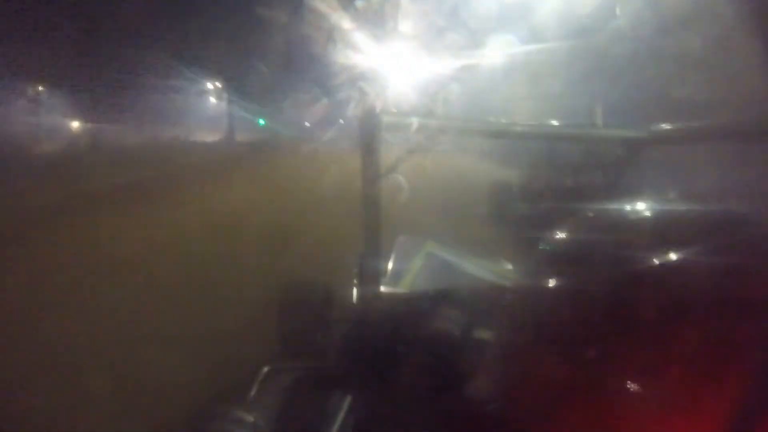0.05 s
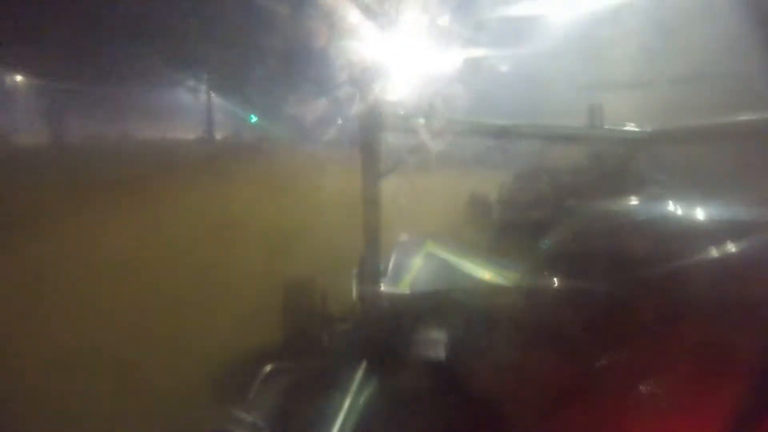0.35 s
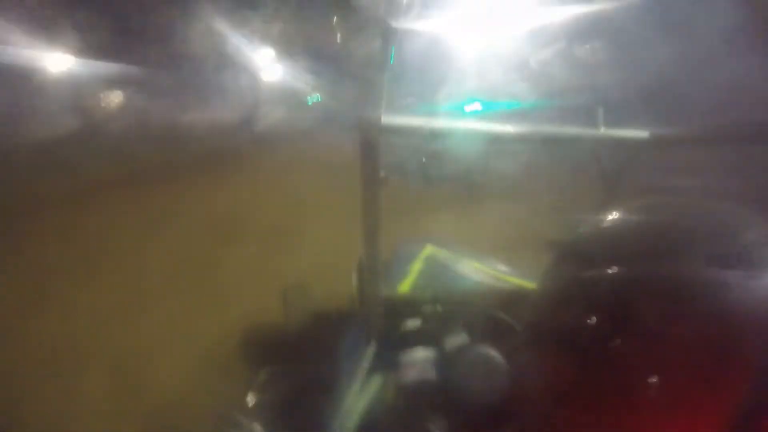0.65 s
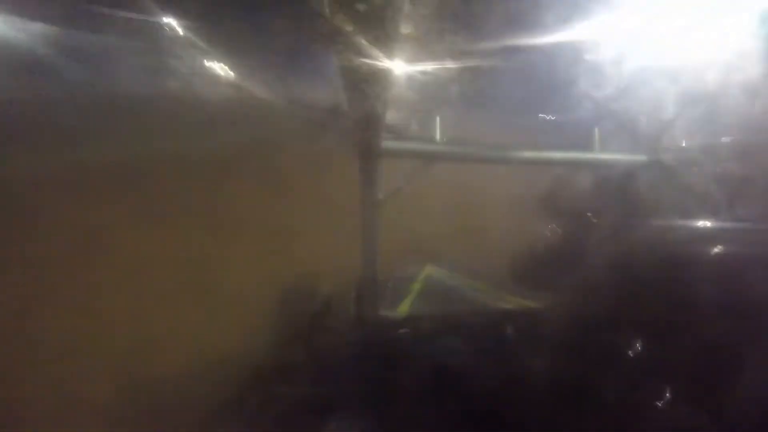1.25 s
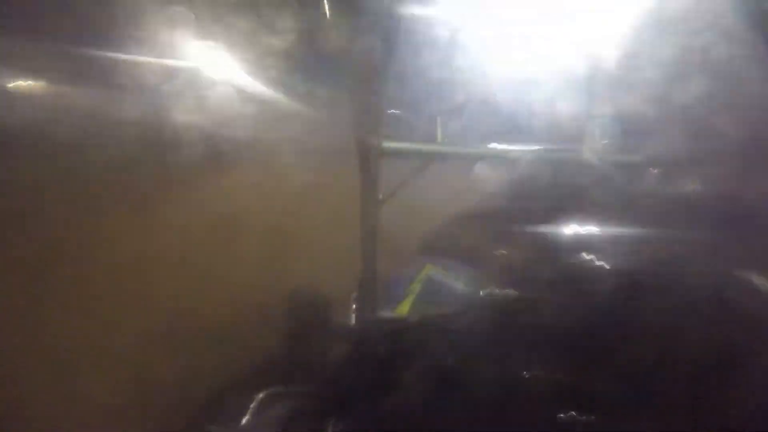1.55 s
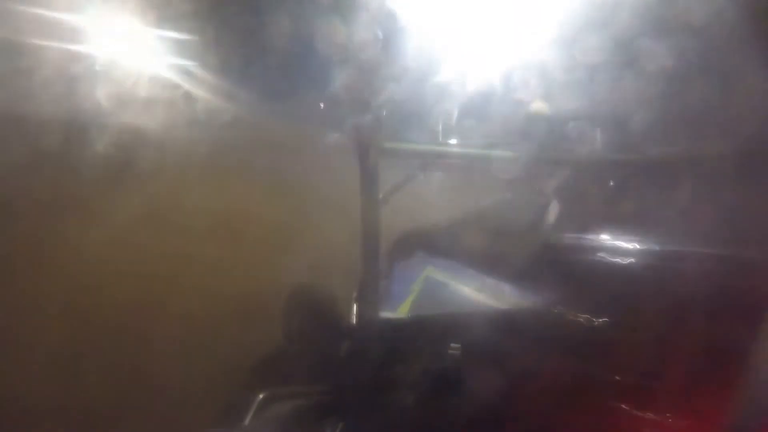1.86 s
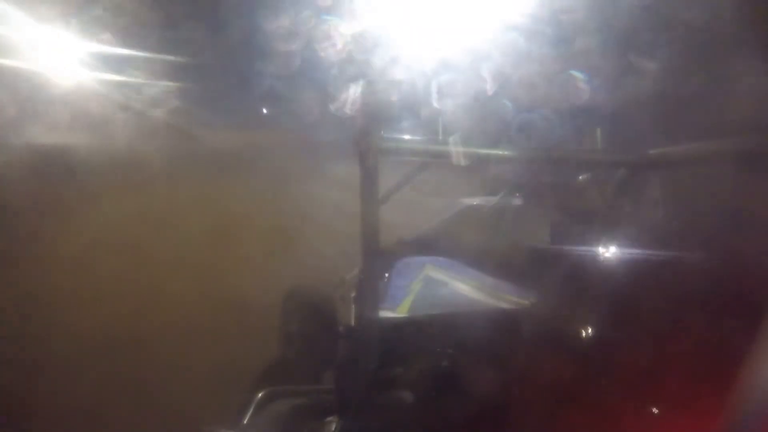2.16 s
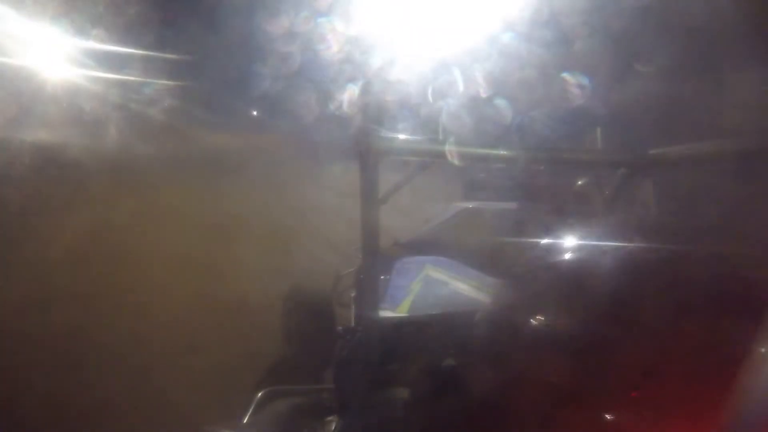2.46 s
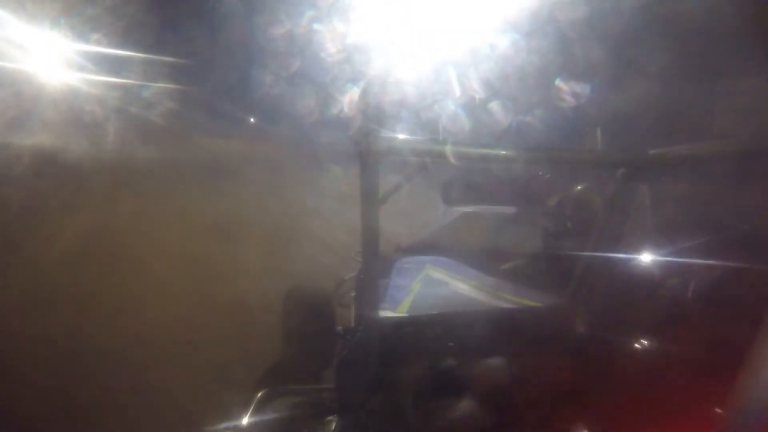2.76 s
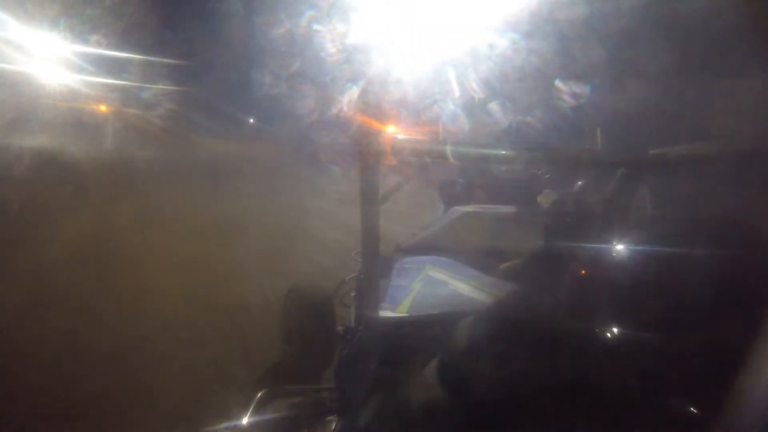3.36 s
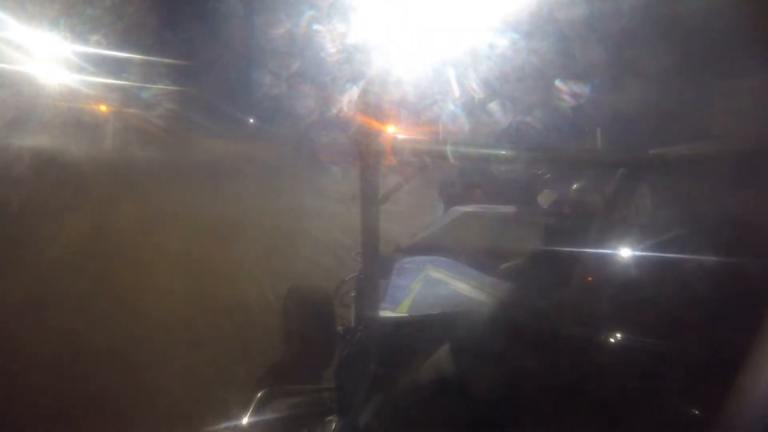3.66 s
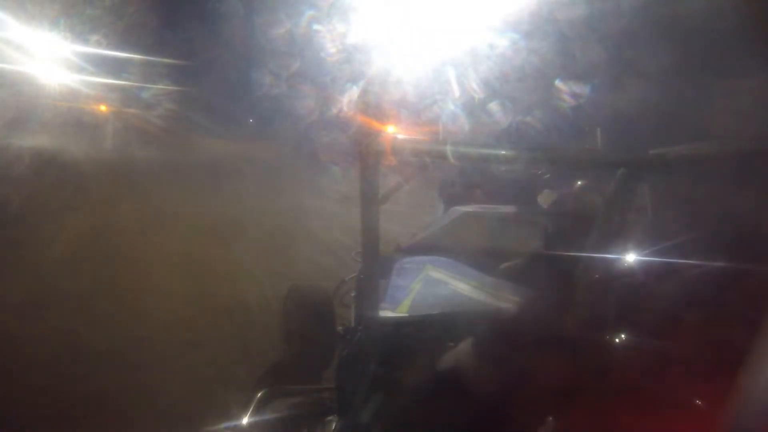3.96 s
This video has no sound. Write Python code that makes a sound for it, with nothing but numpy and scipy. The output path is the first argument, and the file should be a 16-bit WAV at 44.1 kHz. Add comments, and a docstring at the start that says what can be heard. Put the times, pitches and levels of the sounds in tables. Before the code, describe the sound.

A race car's engine roars, drops away, then the car crashes with metallic bangs and rattles.

```python
"""Crash inside a dirt-track race car

The engine roars flat out, a train of exhaust pulses; the throttle shuts and the pitch sinks.
The car hits something and jolts to a stop: blows excite the modes of panels and loose steel,
sheet metal creases, dirt rattles, the chassis bottoms out and the cab booms on one low note.
As it settles, the engines of the other cars grow louder, blurred by reflections."""
import sys
import numpy as np
from scipy import signal
from scipy.fft import rfft, irfft, next_fast_len
from scipy.io import wavfile
from scipy.ndimage import uniform_filter1d, map_coordinates

SR = 44100
rng = np.random.default_rng(int(sys.argv[2]) if len(sys.argv) > 2 else 0)


def generate_wav(sig):
    """Save sig (samples, or channels by samples) to the path in sys.argv[1] as 16-bit PCM at SR."""
    pcm = np.round(np.clip(np.atleast_2d(sig).T, -1, 1) * 32767).astype(np.int16)
    wavfile.write(sys.argv[1], SR, pcm)


N = 176400
T = np.arange(N) / SR
MODE_SCATTER_DB = 3  # a mode's strength varies from blow to blow


def from_db(db):
    """Amplitude ratio of a level in decibels."""
    return 10 ** (np.asarray(db) / 20)


def rms_one(x):
    """Normalisation to unit rms."""
    return x / np.sqrt(np.mean(x ** 2) + 1e-20)


def in_time(rows):
    """Linear interpolation of (time, value) rows at every sample."""
    return np.interp(T, *np.transpose(rows))


def drift(per_s):
    """Smooth random fluctuation of unit rms: a spline through Gaussian values."""
    slow = map_coordinates(rng.standard_normal(1000), [T[::40] * per_s + 2], order=3, mode="wrap")
    return np.interp(T, T[::40], rms_one(slow))


def add(out, start_s, sound):
    """Superposition of a sound from a given time on."""
    i = int(start_s * SR)
    out[i:i + len(sound)] += sound[:N - i]


def colour(x, spectrum):
    """Minimum-phase filtering by a spectrum of (frequency, level) rows; unit rms."""
    size = 2 * next_fast_len(len(x) // 2 + SR // 10, True)
    hz, db = np.transpose(spectrum)
    bin_hz = np.arange(size // 2 + 1) * SR / size
    log_gain = np.log(from_db(np.interp(np.log(bin_hz + 1), np.log(hz), db)))
    causal_cepstrum = irfft(log_gain)[:size // 2]
    response = np.exp(2 * rfft(causal_cepstrum, size))
    return rms_one(irfft(rfft(x, size) * response)[:len(x)])


def ring(force, hz, t60_s):
    """Forced response of one damped mode; unit rms."""
    radius, angle = from_db(-60 / (t60_s * SR)), 2 * np.pi * hz / SR
    return rms_one(signal.lfilter([1, -1], [1, -2 * radius * np.cos(angle), radius ** 2], force + 1e-18))


def damp(x, top_hz=4370):
    """Low-pass filtering: the metal rings little at high frequencies."""
    return signal.sosfilt(signal.butter(8, top_hz, fs=SR, output="sos"), x)


def smear(x, decay_s):
    """Dense reflections as an all-pass filter: pulses blur but keep their spectrum."""
    echoes = rfft(rng.standard_normal(N) * np.exp(-T / decay_s))
    return irfft(rfft(x) * echoes / (np.abs(echoes) + 1e-12), N)


def tones(pulse_hz, orders, waver_db):
    """Engine orders: sines at multiples of the pulse rate, each wavering in level."""
    phase = 2 * np.pi * np.cumsum(pulse_hz) / SR
    return sum(np.sqrt(2) * from_db(db + waver_db * drift(35)) * np.sin(multiple * phase)
               for multiple, db in orders)


def firings(pulse_hz, blast_db=0, scatter_db=1.5, jitter_s=0.00003, blast_decay_s=0.0049):
    """An exhaust pulse train: four uneven firings a cycle, each with a blast of turbulence."""
    # strength of each firing in the cycle: level_db
    cylinders = [-0.5, -5, -3.5, -6]
    count = np.floor(np.cumsum(pulse_hz) / SR).astype(int)
    due = np.flatnonzero(np.diff(count))
    timing, strength = rng.standard_normal((4000, 2))[:len(due)].T
    fired = np.clip(due + jitter_s * SR * timing, 0, N - 1).astype(int)
    pulses = np.zeros(N)
    pulses[fired] = from_db(np.take(cylinders, count[due], mode="wrap") + scatter_db * strength)
    blast_envelope = signal.lfilter([1], [1, -np.exp(-1 / (blast_decay_s * SR))], pulses)
    blast = rms_one(blast_envelope * rng.standard_normal(N))
    mean_flow = uniform_filter1d(pulses, SR // 10)
    return rms_one(pulses - mean_flow) + from_db(blast_db) * blast


def panels(force, pitch_scatter=0.049, split_hz=800):
    """Modal response of the bodywork: a dull thud and a bright clang, each of unit rms."""
    # panel modes: pitch_hz, level_db, t60_s
    modes = [(294, -3.5, 0.21), (333, 4.5, 0.13), (420, -21.5, 0.042), (595.5, 6, 0.096), (697, -3.5, 0.05),
             (904, -2, 0.03), (1046, -6, 0.028), (1340, -4.5, 0.02), (1720, -7, 0.026), (2020, -1.5, 0.018),
             (2180, 2.5, 0.057), (2690, 4.5, 0.03), (4350, -12.5, 0.02), (5020, -5, 0.014)]
    # dull push of a contact: frequency_hz, level_db
    push = [(30, -17.5), (120, -10.5), (220, -16), (400, -7), (620, -10.5), (900, -11.5), (1600, -21),
            (5000, -85.5)]
    # dry crack of a contact: frequency_hz, level_db
    crack = [(200, -29), (600, -9.5), (900, -1.5), (1500, -4), (2200, 0), (2900, -0.5), (3400, -3.5),
             (4600, -6.5), (5800, -21.5), (7500, -51.5), (10000, -68)]
    low, high = 0, 0
    for hz, db, t60_s in modes:
        strength, shift = rng.standard_normal(2)  # both vary with the place struck
        mode = from_db(db + MODE_SCATTER_DB * strength) * ring(force, hz * np.exp(pitch_scatter * shift), t60_s)
        if hz < split_hz:
            low += mode
        else:
            high += mode
    thud = rms_one(damp(low)) + from_db(-7) * colour(force, push)
    clang = rms_one(damp(high)) + from_db(1) * colour(force, crack)
    return rms_one(thud), rms_one(clang)


def other_cars(near_hz=139.8, smear_s=0.014, whine_t60_s=0.016):
    """Reflections blur distant pulse trains into one rasp; a brighter, whining car draws near."""
    # pulse rate of each car in the pack: start_hz, end_hz
    cars = [(127.4, 99), (211.5, 194), (77.8, 75)]
    # loudness of the pack: time_s, level_db
    pack_level = [(0, -94), (2.3, -55), (2.6, -43.5), (3, -43.5), (3.3, -39), (3.6, -32.5), (3.68, -33.5),
                  (3.76, -42.5), (4, -39)]
    # spectrum of the pack: frequency_hz, level_db
    pack_spectrum = [(30, -19.5), (90, 31), (200, -3.5), (300, 8), (420, 6.5), (570, 11), (700, -6),
                     (1100, -25.5), (1500, 2.5), (1950, 10.5), (2300, 3), (2600, 13.5), (2800, 7),
                     (3050, -10), (3420, -31.5), (3600, -18.5), (3850, -10.5), (4300, 6), (4550, -5),
                     (4780, 7), (5050, -2), (6000, -10), (7200, -28), (9000, -34.5), (12000, -80.5)]
    # loudness of the near car: time_s, level_db
    near_level = [(2.4, -67), (3.2, -47.5), (3.65, -42), (3.8, -39.5), (4, -37)]
    # spectrum of the near car: frequency_hz, level_db
    near_spectrum = [(60, -20), (400, 8), (1000, -3.5), (1500, 3), (2200, -2.5), (2800, -4.5), (3150, -9.5),
                     (4100, -2), (6300, -8.5), (8000, -20.5), (11000, -57.5)]
    # narrow noise bands of its whine: pitch_hz, level_db
    whine_bands = [(3610, -11.5), (4810, -8)]
    pack = sum(firings(np.linspace(start_hz, end_hz, N)) for start_hz, end_hz in cars)
    near = colour(smear(firings(np.full(N, near_hz)), smear_s), near_spectrum)
    whine = sum(from_db(db) * ring(ring(rng.standard_normal(N), hz, whine_t60_s), hz, whine_t60_s)
                for hz, db in whine_bands)
    rasp = colour(smear(pack, smear_s), pack_spectrum)
    return from_db(in_time(pack_level)) * rasp + from_db(in_time(near_level)) * (near + whine)


def cab_boom(rise_s=0.02012, rest_hz=97.2, sag_hz=71.5, wander_hz=2.9, waver_db=2.5):
    """Softening resonance: the cab's low note swells and sags with each jolt, over a rumble."""
    # steady boom between jolts: time_s, level_db
    steady_level = [(0, -30), (.4, -28), (.55, -55.5), (.85, -28), (.95, -33.5), (1.5, -28.5), (2.4, -32.5),
                    (2.55, -48), (2.75, -26), (2.95, -26), (3.1, -40), (3.3, -33.5), (3.55, -34),
                    (3.75, -51.5), (4, -52.5)]
    # jolts that excite the cab: start_s, level_db, decay_s
    jolts = [(0.427, -19, 0.1), (0.463, -21, 0.0096), (0.979, -19.5, 0.024), (1.029, -21, 0.016),
             (1.102, -16.5, 0.019), (1.141, -19, 0.042), (1.233, -22.5, 0.0081), (1.305, -23.5, 0.013),
             (1.368, -26.5, 0.094), (1.556, -21, 0.052), (1.655, -24.5, 0.15), (1.742, -18, 0.029),
             (1.847, -16.5, 0.02), (1.933, -20, 0.038), (2.058, -15.5, 0.048), (2.238, -19.5, 0.11),
             (2.573, -22, 0.081), (2.666, -21, 0.043), (2.978, -27, 0.031), (3.319, -34, 0.031),
             (3.426, -24.5, 0.013)]
    # chassis rumble: frequency_hz, level_db
    rumble_spectrum = [(12, -13.5), (25, -21), (45, -8.5), (65, 0.5), (85, -4), (115, -10), (170, -24),
                       (400, -43.5), (2000, -98.5)]
    power = from_db(in_time(steady_level)) ** 2
    for start_s, db, decay_s in jolts:
        rise = np.clip((T - start_s) / rise_s, 0, 1)
        fall = np.exp(-np.maximum(T - start_s - 2 * rise_s, 0) / decay_s)
        power += (from_db(db) * rise * fall) ** 2
    amplitude = np.sqrt(power)
    hz = rest_hz - sag_hz * amplitude + wander_hz * drift(24.97)
    note = rms_one(np.sin(2 * np.pi * np.cumsum(hz) / SR) * from_db(waver_db * drift(35.02)))
    rumble = from_db(-6.5) * colour(rng.standard_normal(N), rumble_spectrum)
    return amplitude * (note + rumble)


def rattle(hits_per_s=1400, spread_db=5, hops_per_s=90, lurch_db=1.5, panel_count=7):
    """Shot noise: dirt and loose parts strike several panels, each with its own modes."""
    # strength of the shaking: time_s, level_db
    level = [(0, -25.5), (.55, -28.5), (.8, -38.5), (.95, -39), (1.1, -39), (1.16, -35.5), (1.34, -31.5),
             (1.375, -50.5), (1.53, -42.5), (1.59, -37), (1.9, -35.5), (2.07, -34.5), (2.2, -45),
             (2.36, -47), (2.66, -42.5), (2.8, -49.5), (2.88, -37), (3.05, -48), (3.45, -43.5), (4, -59)]
    sizes = from_db(spread_db * np.minimum(rng.exponential(1, N), 4)) * rng.choice([-1, 1], N)
    hits = sizes * (rng.random(N) < hits_per_s / SR)
    struck = np.argmax([drift(hops_per_s) for _ in range(panel_count)], axis=0)
    thud, clang = np.sum([panels(hits * (struck == k)) for k in range(panel_count)], axis=0)
    return from_db(in_time(level) + lurch_db * drift(35.064)) * rms_one(thud + from_db(-2.5) * clang)


def thumps(decay_cycles=0.37):
    """A low-frequency transient: one heavy swing each time the chassis bottoms out."""
    # swings of the chassis: peak_s, peak_db, pitch_hz
    swings = [(0.558, -5.5, 62.3), (1.152, -1.5, 61), (1.247, -10.5, 45.5), (1.588, -13, 50)]
    return sum(from_db(db) * np.cos(2 * np.pi * hz * (T - peak_s))
               * np.exp(-np.abs(T - peak_s) * hz / decay_cycles) for peak_s, db, hz in swings)


def clanks(contact_s=0.0029, bounce_s=0.0038, loss_db=6.5, pitch_scatter=0.023):
    """Inelastic rebound: a steel part snaps on the frame, rings and bounces twice, ever weaker."""
    # strikes of loose steel: start_s, ring_db, pitch_hz, snap_db
    strikes = [(1.089, -31.5, 2880, -34), (1.128, -24, 1290, -21), (1.690, -23, 2700, -34),
               (1.855, -26, 2450, -16.5), (1.976, -20, 2820, -18), (2.001, -30, 2070, -48),
               (2.017, -26, 2780, -49.5), (2.222, -22, 2730, -31.5), (2.581, -28, 2060, -50.5),
               (2.663, -22, 2930, -20.5), (2.714, -7.5, 2776, -20), (2.83, -32.5, 2660, -45)]
    # modes of the part: pitch_ratio, level_db, t60_s
    modes = [(.72, -9.5, 0.018), (.93, -11, 0.016), (1, 19.5, 0.026), (1.5, 0.5, 0.02), (1.67, -3.5, 0.018)]
    # dry snap of steel on steel: frequency_hz, level_db
    snap_spectrum = [(300, -11.5), (900, 15), (3000, -5), (4800, -4), (6000, -11), (14000, -50)]
    out, t = np.zeros(N), T[:SR // 4]
    for start_s, ring_db, hz, snap_db in strikes:
        for bounce in range(3):
            force = rng.standard_normal(len(t)) * np.exp(-t / contact_s)
            ringing = 0
            for ratio, db, t60_s in modes:
                gain = from_db(db + MODE_SCATTER_DB * rng.standard_normal())
                mode_hz = hz * ratio * np.exp(pitch_scatter * rng.standard_normal())
                ringing += gain * ring(force, mode_hz, t60_s)
            ringing, snap = damp(ringing), colour(force, snap_spectrum)
            touch = from_db(ring_db) * ringing / np.abs(ringing).max()
            touch += from_db(snap_db) * snap / np.abs(snap).max()
            add(out, start_s, from_db(-loss_db * bounce) * touch)
            start_s += bounce_s * (0.5 + rng.random())
    return out


def creases(low_hz=485, high_hz=1870, pitch_count=18, pops_per_s=2500, t60_cycles=11):
    """Buckling of sheet metal: dense short pops over a range of pitches; unit rms."""
    out = np.zeros(N)
    for hz in np.geomspace(low_hz, high_hz, pitch_count):
        pops = rng.standard_normal(N) * (rng.random(N) < pops_per_s / pitch_count / SR)
        out += ring(pops, hz, t60_cycles / hz)
    return rms_one(out)


def crunches():
    """Plastic deformation: a low crunch and a burst of creasing die away after each heavy blow."""
    # blows that crumple the body: start_s, low_db, crease_db, decay_s
    blows = [(0.444, -22, -23, .06), (0.532, -26, -31, 0.052), (1.117, -17.5, -21, 0.054),
             (1.222, -32, -43.5, 0.076), (1.558, -16, -28.5, 0.02), (1.974, -25.5, -17.5, 0.01),
             (2.223, -24.5, -26.5, 0.023), (2.849, -49, -32.5, 0.016), (3.426, -35, -47, 0.039)]
    # low crunch: frequency_hz, level_db
    spectrum = [(20, -10.5), (55, -6), (100, 5.5), (170, 3), (280, 8), (420, -4), (700, -20), (2000, -41.5),
                (6000, -82)]
    low, creasing = colour(rng.standard_normal(N), spectrum), creases()
    out = np.zeros(N)
    for start_s, low_db, crease_db, decay_s in blows:
        envelope = (T > start_s) * np.exp(-np.abs(T - start_s) / decay_s)
        out += (from_db(low_db) * low + from_db(crease_db) * creasing) * envelope
    return damp(out)


def knocks(landing_s=0.00067, release_s=0.0022, rattle_s=0.03):
    """Impact excitation: a short burst of contacts drives the panels, then a dying rattle."""
    # blows on the bodywork: start_s, contact_s, clang_db, thud_db
    blows = [(1.036, 0.016, -45, -32.5), (1.106, 0.031, -39, -53), (1.113, 0.021, -20, -30),
             (1.142, 0.0217, -26, -36), (1.181, 0.01, -30, -33.5), (1.214, 0.036, -37, -33),
             (1.244, 0.0093, -30.5, -40), (1.283, 0.024, -37.5, -46), (1.323, 0.0026, -31, -53),
             (1.355, 0.0091, -31.5, -31), (1.54, 0.0042, -39.5, -40), (1.557, 0.0057, -29, -42),
             (1.65, 0.0056, -47, -41), (1.691, 0.017, -29.5, -34.5), (1.763, 0.0058, -36, -26),
             (1.854, .012, -26, -25.5), (1.932, 0.0061, -38, -34), (1.975, 0.011, -27, -26.5),
             (2.05, 0.022, -32, -31.5), (2.225, 0.022, -26, -22.5), (2.411, 0.014, -48.5, -35.5),
             (2.447, 0.013, -40.5, -51.5), (2.578, 0.0094, -32, -34.5), (2.607, 0.04, -43, -36),
             (2.663, 0.017, -29.5, -26.5), (2.713, 0.015, -24, -21.5), (2.848, 0.0082, -29.5, -26),
             (3.422, 0.033, -38.5, -35)]
    out, t = np.zeros(N), T[:SR // 4]
    landing = 0.11 * np.exp(-t / landing_s)  # extra force at first touch
    for start_s, contact_s, clang_db, thud_db in blows:
        after = np.maximum(t - contact_s, 0)
        press = landing + np.exp(-after / release_s) + from_db(-20) * np.exp(-after / rattle_s)
        thud, clang = panels(press * rng.standard_normal(len(t)))
        force_rms = np.sqrt(np.mean(press ** 2))
        add(out, start_s, force_rms * (from_db(thud_db) * thud + from_db(clang_db) * clang))
    return out


def engine(smear_s=0.0043):
    """Source and filter: exhaust pulses roar under throttle; coasting leaves a rough low drone."""
    # engine speed: time_s, pulse_rate_hz
    speed = [(0, 149.4), (.07, 150.2), (.25, 147.9), (.36, 150.7), (.45, 151.5), (.54, 146.6), (.58, 106.3),
             (.63, 105.5), (.75, 96.24), (.88, 75.6), (1.1, 62.26)]
    # exhaust as heard in the cab: frequency_hz, level_db
    exhaust_spectrum = [(20, -10), (60, 9.5), (150, -1), (200, 0.5), (300, -1.5), (450, 2), (680, -3),
                        (1200, -1.5), (1450, -4), (1800, -3), (2130, 1.5), (2330, -5), (2650, 0.5),
                        (3150, -17), (3900, -20.5), (4080, -10), (4900, -17.5), (5900, -21), (7200, -36.5),
                        (9000, -54), (12000, -86.5)]
    # loudness of the roar: time_s, level_db
    roar_level = [(0, -20), (.42, -21), (.46, -22), (.51, -24), (.55, -32.5), (.59, -38.5), (.74, -31.5),
                  (.86, -41.5), (1, -50.5), (1.15, -29.5), (1.4, -56)]
    # tones under throttle: pulse_rate_multiple, level_db
    roar_orders = [(.5, -9.5), (1, -9.5), (2, -14.5), (3, -16.5), (6, -16)]
    # loudness of the coasting drone: time_s, level_db
    drone_level = [(.54, -71), (.57, -29), (.66, -15.5), (.81, -18), (.87, -24.5), (.95, -28), (1.05, -97)]
    # tones of the drone: pulse_rate_multiple, level_db
    drone_orders = [(1, -6), (3, -25), (7, -23)]
    pulse_hz = in_time(speed)
    throttle = ((pulse_hz - pulse_hz.min()) / np.ptp(pulse_hz)) ** 2
    pulses = firings(pulse_hz, blast_db=2)
    chuff = 1 + np.cos(2 * np.pi * np.cumsum(pulse_hz) / SR)
    coasting_hiss = from_db(4.5) * rms_one(chuff * rng.standard_normal(N))
    exhaust = throttle * pulses + np.sqrt(1 - throttle ** 2) * coasting_hiss
    rasp = from_db(-0.5) * colour(smear(exhaust, smear_s), exhaust_spectrum)
    roar = rasp + throttle * tones(pulse_hz, roar_orders, waver_db=1.5)
    drone = tones(pulse_hz, drone_orders, waver_db=3.5)
    return roar * from_db(in_time(roar_level)) + drone * from_db(in_time(drone_level))


def scene():
    """Superposition of all sources at the seat, in one channel."""
    mix = engine() + knocks() + clanks() + crunches() + rattle() + cab_boom() + thumps() + other_cars()
    return mix[None]


def record(dry):
    """Band limiting: a steep low-pass filter with its stopband above 13 kHz."""
    return signal.sosfilt(signal.cheby2(12, 70, 13000, fs=SR, output="sos"), dry)


dry = scene()
out = record(dry)
generate_wav(out)
```